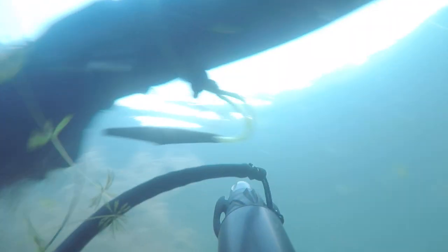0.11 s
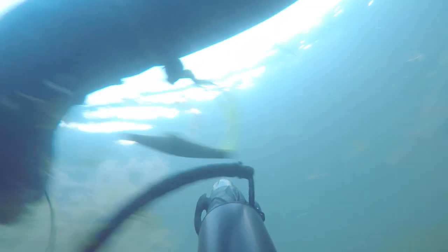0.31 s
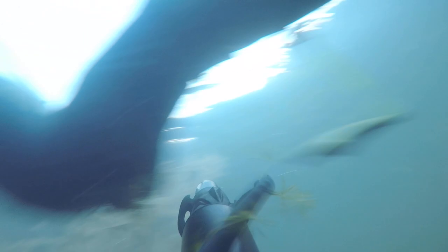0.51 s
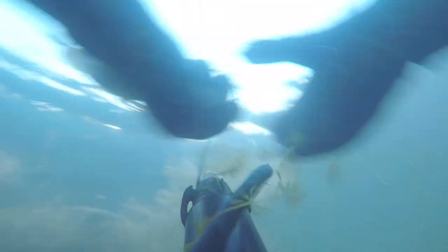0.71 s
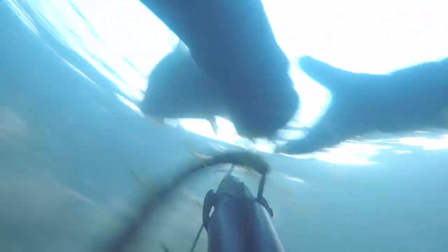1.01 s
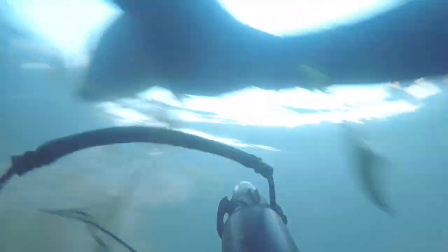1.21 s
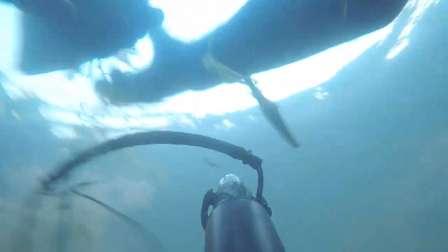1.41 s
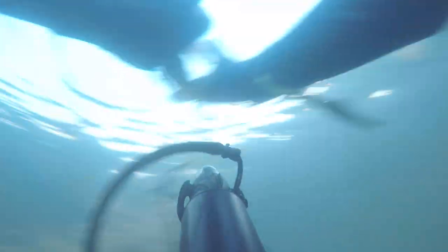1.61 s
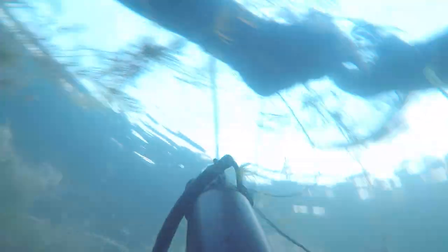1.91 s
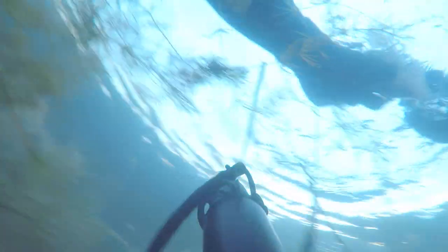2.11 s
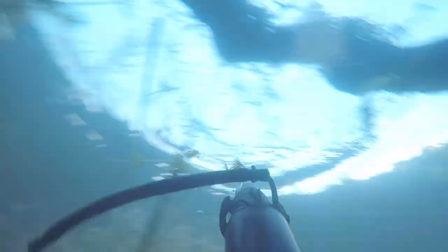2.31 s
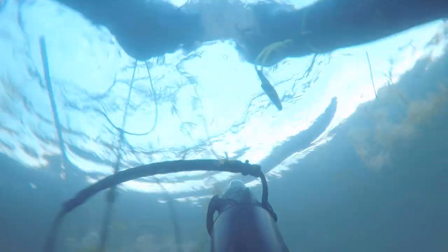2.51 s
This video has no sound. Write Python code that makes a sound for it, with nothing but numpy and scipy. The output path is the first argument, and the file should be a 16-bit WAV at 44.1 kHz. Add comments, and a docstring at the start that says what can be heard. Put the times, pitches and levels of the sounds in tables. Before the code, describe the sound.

Muffled knocks and deep booms on a diver's camera housing under water, heard from inside. Low wash and soft gulps open; a sharp tick and bump at 0.47 s lead to a booming thud near 0.58. Rubbing swells around 0.75, a dull thump lands at 1.28, knocks at 1.6, the hardest clack at 1.85, then a bubbly, fizzing cluster at 2.2-2.3 before quieter water over faint hiss.

```python
"""The mount of a sealed camera housing booms at its lowest mode, a near sine, on a diver's gear under water.
Gulps and dull bumps are low sines that swell and fade; the wash of water is flickering bands of low noise.
Gloved hands work above: cord and gloves rub and knock the shell, ringing its damped resonances.
Small bubbles and ticks are pings of narrow noise; crackling bursts of fizz lie above a treble background hiss.
Two microphone ports receive it all, with leads and level differences between left and right."""
import sys
import numpy as np
from scipy import signal
from scipy.fft import rfft, irfft, next_fast_len
from scipy.io import wavfile

SR = 44100
rng = np.random.default_rng(int(sys.argv[2]) if len(sys.argv) > 2 else 0)


def pcm_store(signal):
    """Save signal as 16-bit PCM."""
    levels = np.round(np.clip(np.atleast_2d(signal), -1, 1) * 32767)
    wavfile.write(sys.argv[1], SR, levels.astype(np.int16).T)


N = 116865   # length in samples

# Treble background hiss, dipping briefly near 0.6 s, before its trim: (time [s], level [dB])
HISS_LEVEL = [(0, -59), (.58, -61.5), (.597, -71), (.64, -65.5), (.72, -62), (1.1, -61.5), (1.7, -60.5),
              (2.65, -60)]
# Spectrum of the background hiss: (frequency [Hz], relative density [dB per Hz])
HISS_SPECTRUM = [(1000, 13.5), (3000, 10.5), (4800, 1), (6400, 6), (9000, 3.5), (11000, -4.5),
                 (13000, -15.5), (15000, -34)]
# Bursts of fizz, before the trims of hiss and crackle: (time of crest [s], level [dB], length at half height [s])
FIZZ_BURSTS = [(0.409, -54.5, 0.028), (0.45, -57.5, 0.023), (0.485, -53, 0.021), (1.29, -53, 0.033),
               (1.805, -57.5, 0.18), (2.176, -54, 0.052), (2.226, -55, 0.038), (2.275, -54, 0.011),
               (2.64, -56.5, 0.038)]
# Spectrum of the hiss in the bursts: (frequency [Hz], relative density [dB per Hz])
BURST_SPECTRUM = [(2500, 4.5), (3800, 12), (4900, -16), (6500, 5.5), (9000, -11.5), (11500, -23.5),
                  (15000, -30)]
HISS_TRIM_DB, BURST_TRIM_DB = 1.0, 3.5
HISS_CORRELATION = 0.028   # between the two ports
CRACKLE_PER_S, CRACKLE_TRIM_DB = 350, 15.5
CRACKLE_CYCLES = 6.5   # cycles in a 60 dB decay, unless the mode's shortest decay is longer

# Small bubbles and ticks, short pings of narrow noise:
# (time of onset [s], peak level [dB], pitch [Hz], 60 dB decay time [s])
# A chance level difference between the ports is added to each.
PINGS = [(0.476, -24.5, 3370, 0.016), (0.477, -34, 3950, .014), (0.484, -24.5, 3330, 0.025),
         (1.274, -25, 2396, 0.024), (1.284, -26, 2660, 0.032), (1.832, -44, 4397, .015),
         (1.908, -44.5, 3880, .015), (2.185, -30, 3744, 0.0054), (2.189, -37, 4280, 0.013),
         (2.207, -33.5, 3000, 0.013), (2.212, -31.5, 2500, .014), (2.226, -35, 2540, 0.022),
         (2.272, -32, 2817, 0.0069), (2.316, -46.5, 3980, .025), (2.321, -36, 2760, 0.04),
         (2.344, -38.5, 2400, 0.038)]
PING_RISE_S, PING_HALF_WIDTH_HZ = 0.002, 190

# Water washing round the shell, before its trim: (time [s], level [dB])
WASH_LEVEL = [(0, -33), (.2, -28), (.33, -36), (.5, -28.5), (.72, -25), (.95, -34), (1.17, -26),
              (1.36, -32.5), (1.56, -30.5), (1.78, -20), (1.96, -30), (2.22, -22.5), (2.35, -24),
              (2.41, -39), (2.65, -31.5)]
# Spectrum of the wash: (frequency [Hz], relative density [dB per Hz])
WASH_SPECTRUM = [(15, 3), (54, -2), (81, -13.5), (114, -11.5), (167, -6.5), (248, -5.5), (402, -22),
                 (536, -37), (728, -33.5), (1100, -36.5), (1430, -74)]
WASH_TRIM_DB = 3.5
LOOSE_DB, LOOSE_HZ = -9.5, 193   # part of the wash each port has for itself, above this pitch

# Modes of the shell:
# (frequency [Hz], level [dB], 60 dB decay time [s], left minus right [dB], lead of the left port [rad])
SHELL_MODES = [(419.3, -1.5, 0.027, 6.5, 1.27), (502, -4, 0.063, 3.5, 3.5), (718.3, -3.5, 0.039, 5, -1.26),
               (858, -1.5, 0.041, -3.5, 3.5), (1285, -6, 0.019, 2.5, 3.5), (1550, -12, 0.0089, -8.5, 0.5),
               (1800, -9, 0.023, 1, 0.83), (1989, -6, 0.02, -1.5, 1.25), (2487, -17.5, 0.035, -0.5, 4),
               (2735, -23, 0.02, 8.5, -0.5), (3238, -16, 0.019, 2.5, -2.2), (3590, -30, 0.0088, 4.5, -0.5),
               (4330, -41, 0.011, -6.5, -7.5)]
SPLIT_HZ = 1050    # parts low modes from high modes
MUFFLE_HZ = 3960   # low-pass on the sound of the shell

# Rubbing, before its trims: (time [s], level of the low modes [dB], level of the high modes [dB])
RUB_LEVELS = [(0, -42.5, -50), (.13, -64, -66), (.35, -54, -65), (.41, -48.5, -57), (.52, -49.5, -48.5),
              (.57, -41.5, -46), (.62, -43, -52.5), (.725, -41, -48.5), (.75, -35, -39), (.87, -38.5, -44),
              (.91, -46, -52), (1.0, -51, -53), (1.13, -53, -58.5), (1.2, -36.5, -42), (1.26, -50.5, -47),
              (1.35, -62.5, -66), (1.57, -53, -55), (1.59, -42, -39.5), (1.7, -44, -52.5), (1.78, -36, -42),
              (1.9, -35, -51), (1.94, -50, -53), (2.04, -41, -45), (2.12, -51, -53), (2.2, -42.5, -52),
              (2.31, -50, -48), (2.38, -62.5, -81), (2.58, -51, -60), (2.65, -50.5, -41.5)]
RUB_GRAINS_PER_S, RUB_SPREAD_DB, RUB_FLUTTER_DB = 1800, 1.5, 2.5
RUB_TRIM_DB, RUB_LOW_TRIM_DB = 4.5, 5.0   # all modes; the low ones in addition

# Knocks, before their trims:
# (time of contact [s], level [dB], strongest pitch [Hz], contact decay [s], thump relative to level [dB])
KNOCK_CONTACTS = [(0.467, -21, 1200, 0.0014, -0.5), (0.564, -34, 1870, 0.015, 13),
                  (.581, -23, 1800, 0.0031, 7), (0.598, -31, 1790, 0.009, 15),
                  (0.752, -31, 1990, 0.0026, 2.5), (0.986, -32.5, 3120, 0.0025, -4),
                  (1.019, -47.5, 1900, 0.0038, 12), (1.325, -39, 1850, 0.0034, -0.5),
                  (1.579, -33.5, 2082, 0.0023, -12), (1.652, -22, 2000, 0.0012, -7),
                  (1.673, -24, 2020, 0.0017, 6), (1.762, -37, 1940, 0.0067, 14.5),
                  (1.844, -23, 1750, 0.0059, -1), (1.848, -12, 2010, 0.0022, -6.5),
                  (1.884, -27, 1880, 0.0022, -6), (1.917, -25.5, 1580, 0.0047, -4.5),
                  (2.104, -43.5, 1822, 0.0033, 16), (2.132, -33, 3030, 0.0024, -0.5),
                  (2.184, -21.5, 2300, 0.0016, -4.5), (2.192, -26.5, 2000, 0.0015, 1),
                  (2.2725, -17.5, 1437, 0.0022, -6), (2.28, -28.5, 1500, .006, 0.5),
                  (2.297, -24.5, 1740, 0.0048, 8.5)]
KNOCK_RISE_S, KNOCK_FOCUS_OCT = 0.0007, 0.21
KNOCK_TRIM_DB, THUMP_TRIM_DB = 2, 9.5
THUMP_TILT_DB_PER_OCT = -3.5   # knocks drive the deepest modes harder than rubbing does

# Gulps of water and dull bumps:
GULP_SWELLS = [(0.192, -25.5, 276.6, 0.047), (0.241, -30.5, 397.5, 0.046), (0.262, -20.5, 262, 0.016),
               (0.470, -10, 432, 0.0059), (0.482, -6, 167, 0.016), (0.57, -16, 87.6, 0.026),
               (0.59, -17, 180, 0.049), (0.601, -14, 407, 0.01), (0.699, -24, 259, 0.069),
               (0.74, -18.5, 174, 0.029), (0.868, -20, 176.6, 0.033), (1.154, -14, 190, 0.011),
               (1.201, -17.5, 167.6, 0.03), (1.281, -6.5, 105.6, 0.011), (1.295, -17.5, 161.6, 0.038),
               (1.312, -15.5, 94.3, 0.029), (1.613, -8.5, 145.6, 0.0087), (1.665, -19.5, 181, 0.032),
               (1.766, -12.5, 162, 0.032), (1.792, -10, 195, 0.025), (1.83, -17.5, 180.4, 0.03),
               (1.858, -17, 443, 0.0079), (1.861, -15.5, 165.6, 0.057), (2.143, -21, 172.4, 0.13),
               (2.2, -13.5, 94.2, 0.025), (2.217, -10.5, 141.4, 0.03), (2.221, -17, 242, 0.046),
               (2.263, -12, 222.5, 0.014), (2.326, -10, 176.4, 0.05)]
GULP_TAIL = 1.21   # the fall lasts this many times the rise

# Boom of the mount: (time [s], level [dB])
BOOM_LEVEL = [(0, -32), (.4, -35.5), (.555, -24), (.58, -9), (.68, -20), (.75, -14.5), (.94, -31),
              (1.2, -26.5), (1.26, -34.5), (1.28, -11.5), (1.35, -20.5), (1.44, -37), (1.64, -37),
              (1.685, -12.5), (1.72, -41.5), (1.8, -16), (1.84, -25), (1.86, -8.5), (1.93, -32.5),
              (2.2, -24.5), (2.245, -13.5), (2.3, -18), (2.38, -33.5), (2.49, -31), (2.65, -35.5)]
# Pitch of the boom: (time [s], frequency [Hz])
BOOM_FREQUENCY = [(0, 63.3), (.6, 65.6), (.94, 66.2), (1.15, 62.1), (1.88, 65.25), (2.05, 60.08),
                  (2.65, 59.3)]
BOOM_NOISE_DB, BOOM_WIDTH_HZ = -15, 20   # noise relative to the tone, bandwidth of its resonance

# Phase between the ports: (frequency [Hz], lead of the left port [rad])
PORT_LEAD = [(0, 0.5), (100, -0.24), (170, 1.17), (250, 0), (330, 1.94), (400, 0.34), (500, 2.5),
             (1100, 2.5)]
# Level between the ports: (frequency [Hz], left minus right [dB])
PORT_TILT = [(60, -0.4), (110, 1.5), (170, 0), (250, 11), (350, 1), (500, -3), (1100, -1)]
LEFT_RIGHT = np.array([[1], [-1]])
CUTOFF_HZ = 15000


def amp(db):
    """Decibels define an amplitude ratio."""
    return 10 ** (np.asarray(db) / 20)


def rms_one(x):
    """Division by the root mean square normalizes power."""
    return x / np.sqrt(np.mean(x ** 2) + 1e-20)


def in_time(rows):
    """Linear interpolation turns each table column into a curve over time."""
    s, *columns = np.transpose(rows)
    return [np.interp(np.arange(N) / SR, s, c) for c in columns]


def filtered(x, order, hz, kind="low"):
    """A Butterworth filter has a maximally flat passband."""
    return signal.sosfilt(signal.butter(order, hz, kind, fs=SR, output="sos"), x)


def drift(rate):
    """Two equal low-pass poles at rate (Hz) turn white noise into a slow fluctuation of rms 1."""
    r = np.exp(-2 * np.pi * rate / SR)
    slow = signal.lfilter([1], [1, -2 * r, r * r], rng.standard_normal(N + SR))
    return rms_one(slow[SR:])   # the first second lets the filter settle


def ring(x, hz, t60):
    """A damped resonator answers a unit click with a decaying sine of initial height 1."""
    r, w = amp(-60 / (t60 * SR)), 2 * np.pi * hz / SR
    return signal.lfilter([0, np.sin(w)], [1, -2 * r * np.cos(w), r * r], x + 1e-18)


def mode(x, hz, db, t60, pan_db, lead):
    """A damped mode reaches each port with its own phase and level."""
    r, w = amp(-60 / (max(t60, 2e-3) * SR)), 2 * np.pi * hz / SR
    heard = []
    for side in (1, -1):
        phase = side * lead / 2
        start = [np.sin(phase), r * np.sin(w - phase)]
        rung = signal.lfilter(start, [1, -2 * r * np.cos(w), r * r], x + 1e-18)
        heard.append(amp(db + side * pan_db / 2) * rung)
    return np.array(heard)


def banded(colour, low, count, patchy_db, rate, channels):
    """Half-octave bands of noise, fluctuating independently, sum to a coloured noise of rms 1."""
    out, white = 0, rng.standard_normal((2, channels, N))
    hz, db = np.transpose(colour)
    for k in range(count):
        edge = low * 2 ** (k / 2)
        band = filtered(white[k % 2], 2, [edge, edge * np.sqrt(2)], "band")   # neighbours differ in noise
        centre = edge * 2 ** .25
        level_db = np.interp(np.log(centre), np.log(hz), db)
        out = out + band * amp(level_db + patchy_db * drift(rate))
    return rms_one(out)


def ports(x):
    """Two receivers differ in phase and level as functions of frequency."""
    edge = SR // 4
    size = next_fast_len(N + 2 * edge)
    hz = np.arange(size // 2 + 1) * SR / size
    tilt_db, lead = np.interp(hz, *np.transpose(PORT_TILT)), np.interp(hz, *np.transpose(PORT_LEAD))
    half = amp(tilt_db / 2) * np.exp(.5j * lead)   # the left gains half, the right loses half
    spectrum = rfft(np.pad(x, edge, "reflect", reflect_type="odd"), size)
    return irfft(spectrum * np.array([half, 1 / half]), size)[:, edge:edge + N]


def hiss(gain, colour):
    """Sum and difference of two independent noises make fine hiss, mostly uncorrelated at the ports."""
    mid, side = banded(colour, 930, count=8, patchy_db=1.05, rate=26.0, channels=2)
    both = np.sqrt(1 + HISS_CORRELATION) * mid + np.sqrt(1 - HISS_CORRELATION) * side * LEFT_RIGHT
    return gain * both * amp(-1.2 * LEFT_RIGHT)


def burst_envelope():
    """Gaussian pulses superpose as the amplitude of the bursts of fizz."""
    t = np.arange(N) / SR
    return sum(amp(db) * np.exp(-np.log(2) * (2 * (t - s) / length) ** 2) for s, db, length in FIZZ_BURSTS)


def crackle(gain):
    """Tiny bubbles bursting in the fizz are sparse impulses, each exciting a briefly ringing resonance."""
    heights = amp(4.3 * np.minimum(rng.exponential(1, N), 3))
    ticks = (rng.random(N) < CRACKLE_PER_S / SR) * heights * gain
    pitches, dealt = np.geomspace(2100.0, 4500.0, 12), rng.integers(0, 12, N)
    out = 0
    for k, hz in enumerate(pitches):
        pan_db, lead = rng.uniform(-1.3, 2, 2)   # each pitch has a side of its own
        out = out + mode(ticks * (dealt == k), hz, 0, CRACKLE_CYCLES / hz, pan_db, lead)
    return amp(CRACKLE_TRIM_DB) * out


def bubbles_and_ticks():
    """Slow noise modulates a decaying carrier into a rough ping, each with its own direction."""
    out, t = np.zeros((2, N + SR)), np.arange(SR // 10) / SR
    white = rng.standard_normal((len(PINGS), 2, SR // 5))
    slow = filtered(white, 2, PING_HALF_WIDTH_HZ)[..., SR // 10:]
    directions = rng.uniform(-1.2, 1, (len(PINGS), 2))
    for (s, db, hz, t60), (lead, pan), (a, b) in zip(PINGS, directions, slow):
        shape = (1 - np.exp(-t / PING_RISE_S)) * amp(-60 * t / t60)
        turn = 2 * np.pi * hz * t + lead * LEFT_RIGHT
        ping = shape * ((2 + rms_one(a)) * np.sin(turn) + rms_one(b) * np.cos(turn))
        i = int(s * SR)
        out[:, i:i + len(t)] += amp(db + 2 * pan * LEFT_RIGHT) * ping / abs(ping).max()
    return out[:, :N]


def wash():
    """Flow noise is random and broadband: one shared channel, then one for each port."""
    noise = banded(WASH_SPECTRUM, 16.44, count=12, patchy_db=3.0, rate=16.6, channels=3)
    return amp(in_time(WASH_LEVEL)[0] + WASH_TRIM_DB) * noise


def rub():
    """Friction is a dense train of random impulses, exciting every mode of the shell."""
    low_db, high_db = in_time(RUB_LEVELS)
    heights_db = RUB_SPREAD_DB * np.minimum(rng.exponential(1, N), 4) + RUB_FLUTTER_DB * drift(41.0)
    grains = (rng.random(N) < RUB_GRAINS_PER_S / SR) * amp(heights_db)
    low = high = 0
    for row in SHELL_MODES:
        part = mode(grains * rng.standard_normal(N), *row)   # strengths of its own for each mode
        if row[0] < SPLIT_HZ:
            low = low + part
        else:
            high = high + part
    low = amp(low_db + RUB_LOW_TRIM_DB) * rms_one(filtered(low, 3, SPLIT_HZ))
    high = amp(high_db) * rms_one(filtered(high, 2, SPLIT_HZ, "high"))
    return amp(RUB_TRIM_DB) * (low + high)


def knocks():
    """A brief noisy contact force excites the modes near its pitch most, and thumps the low ones."""
    out, size = np.zeros((2, N + SR)), 2048
    noise = rng.standard_normal((len(KNOCK_CONTACTS), size))
    spread = rng.standard_normal((len(KNOCK_CONTACTS), len(SHELL_MODES)))
    t, hz = np.arange(size) / SR, np.array(SHELL_MODES)[:, 0]
    thump_gain = amp(THUMP_TILT_DB_PER_OCT * np.log2(hz / SPLIT_HZ))[:, None, None]
    for (s, db, pitch_hz, length, thump_db), n, chance in zip(KNOCK_CONTACTS, noise, spread):
        touch = np.zeros(SR // 10)
        touch[:size] = n * np.exp(-t / length) * np.minimum(t / KNOCK_RISE_S, 1)
        parts = np.array([mode(touch, *row) * amp(2 * c) for row, c in zip(SHELL_MODES, chance)])
        focus = np.exp(-.5 * (np.log2(hz / pitch_hz) / KNOCK_FOCUS_OCT) ** 2)[:, None, None]
        low = filtered((parts * thump_gain)[hz < SPLIT_HZ].sum(0), 2, SPLIT_HZ)
        high = (parts * focus)[hz > SPLIT_HZ].sum(0)
        thump = amp(thump_db + THUMP_TRIM_DB) * low / abs(low).max()
        knock = amp(KNOCK_TRIM_DB) * high / abs(high).max()
        i = int(s * SR)
        out[:, i:i + len(touch)] += amp(db) * (knock + thump)
    return out[:, :N]


def gulps():
    """A lopsided Gaussian envelope swells and fades a low sine, over a few cycles or some twenty."""
    out, t = np.zeros(N + SR), np.arange(-SR // 10, SR // 5) / SR
    for s, db, hz, length in GULP_SWELLS:
        stretch = np.where(t > 0, GULP_TAIL, 1)
        shape = np.exp(-np.log(2) * (2 * t / (length * stretch)) ** 2)
        i = int(s * SR) + SR // 10
        out[i:i + len(t)] += amp(db) * shape * np.cos(2 * np.pi * hz * t)
    return out[SR // 5:N + SR // 5]


def boom():
    """The lowest mode of the mount swings as a near sine, with a little noise in the same resonance."""
    (hz,), (db,) = in_time(BOOM_FREQUENCY), in_time(BOOM_LEVEL)
    tone = np.sqrt(2) * np.sin(2 * np.pi * np.cumsum(hz) / SR)   # rms 1
    t60 = 2.2 / BOOM_WIDTH_HZ   # decay time is inverse to bandwidth
    noise = rms_one(ring(rng.standard_normal(N), hz.mean(), t60))
    return amp(db) * (tone + amp(BOOM_NOISE_DB) * noise)


def scene():
    """Linear superposition joins the sources at the two ports."""
    bursts = burst_envelope()
    background_hiss = hiss(amp(in_time(HISS_LEVEL)[0] + HISS_TRIM_DB), HISS_SPECTRUM)
    burst_hiss = hiss(bursts * amp(BURST_TRIM_DB), BURST_SPECTRUM)
    water = wash()
    loose = amp(LOOSE_DB) * filtered(water[1:], 2, LOOSE_HZ, "high")
    shell = filtered(rub() + knocks() + crackle(bursts), 6, MUFFLE_HZ)
    deep = ports(boom() + gulps() + water[0])
    return background_hiss + burst_hiss + bubbles_and_ticks() + loose + shell + deep


def record(dry):
    """A steep low-pass filter holds everything above the cutoff at least 60 dB down."""
    return signal.sosfilt(signal.cheby2(12, 60, CUTOFF_HZ, fs=SR, output="sos"), dry)


dry = scene()
out = record(dry)
pcm_store(out)
```